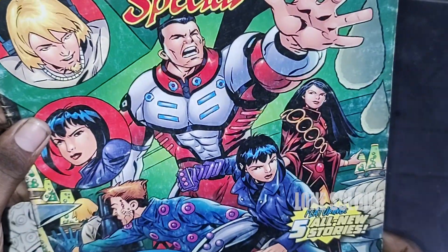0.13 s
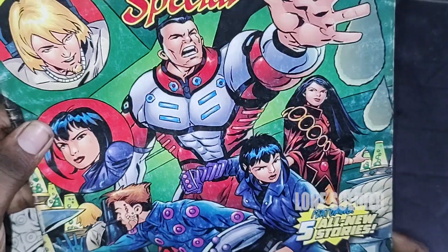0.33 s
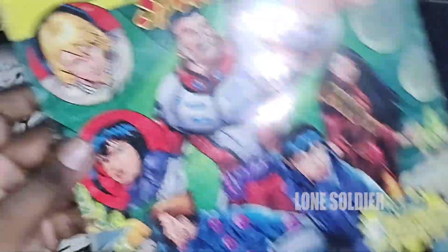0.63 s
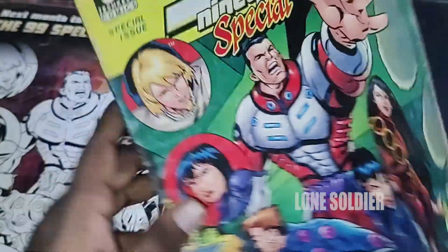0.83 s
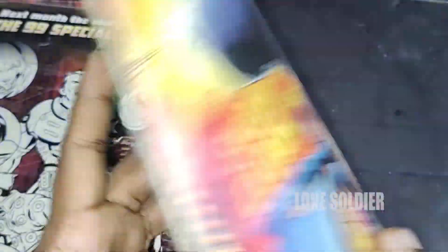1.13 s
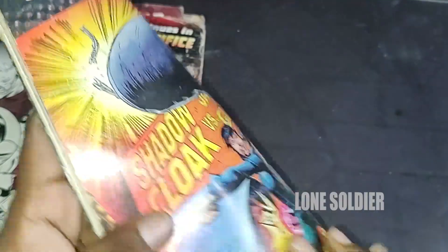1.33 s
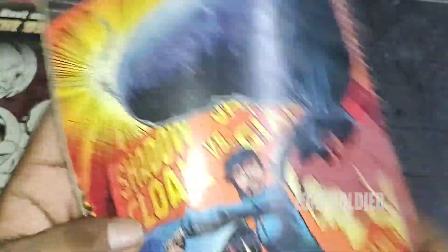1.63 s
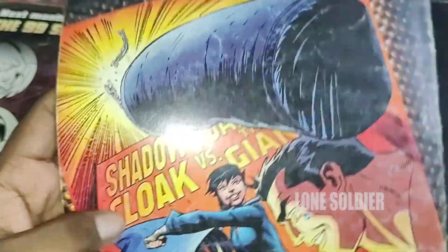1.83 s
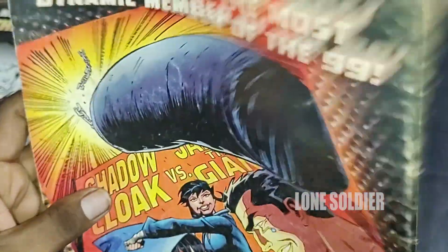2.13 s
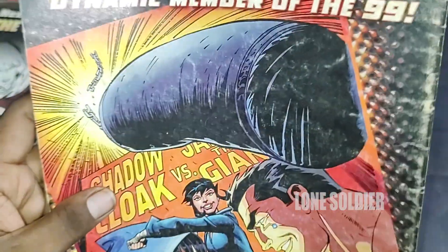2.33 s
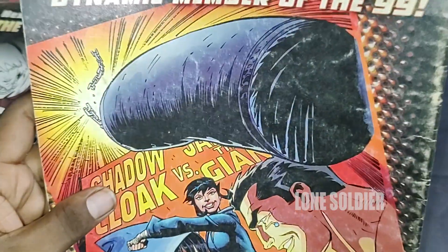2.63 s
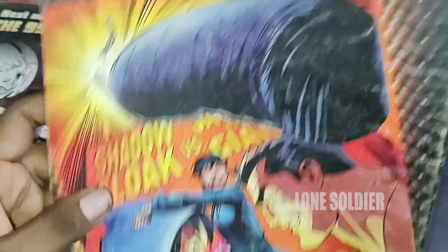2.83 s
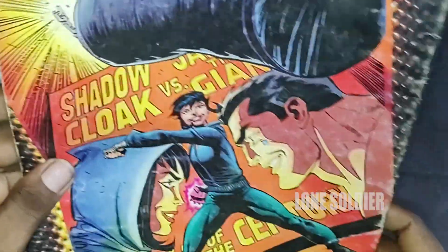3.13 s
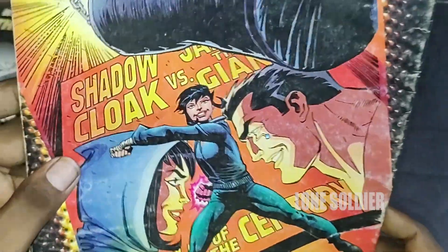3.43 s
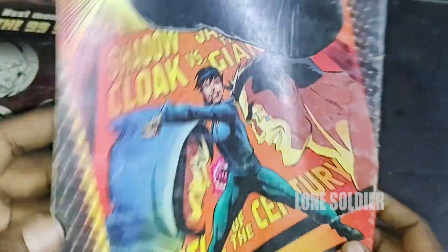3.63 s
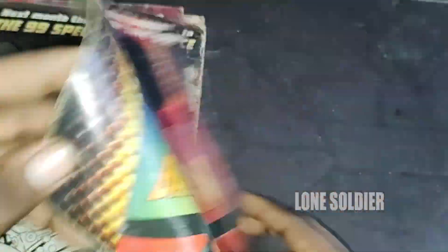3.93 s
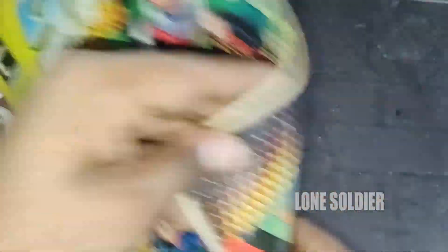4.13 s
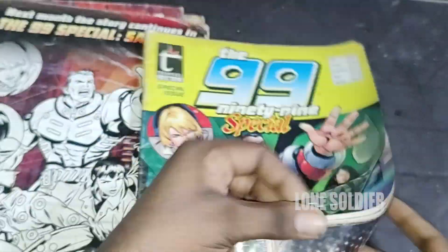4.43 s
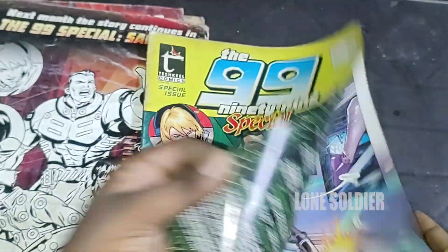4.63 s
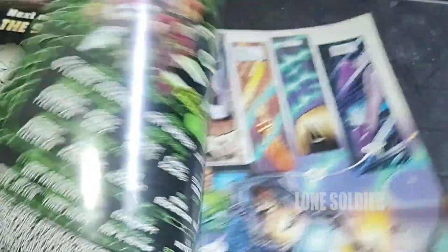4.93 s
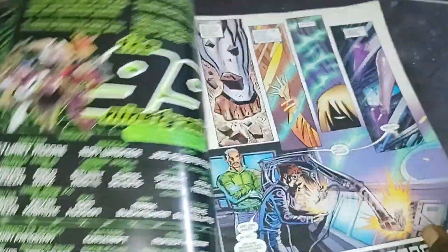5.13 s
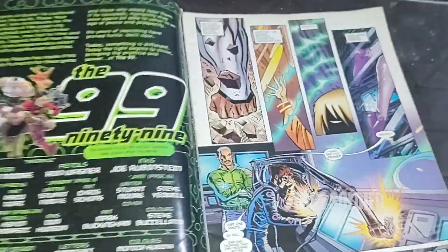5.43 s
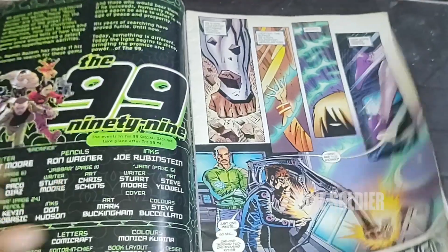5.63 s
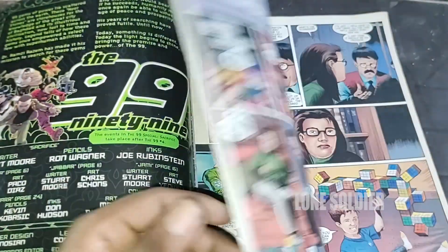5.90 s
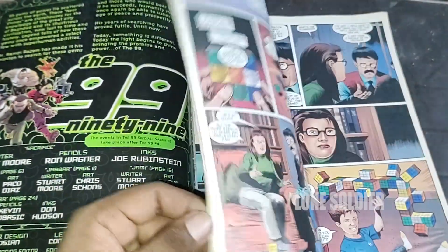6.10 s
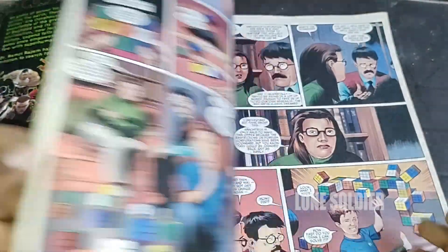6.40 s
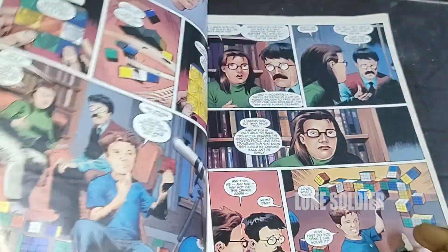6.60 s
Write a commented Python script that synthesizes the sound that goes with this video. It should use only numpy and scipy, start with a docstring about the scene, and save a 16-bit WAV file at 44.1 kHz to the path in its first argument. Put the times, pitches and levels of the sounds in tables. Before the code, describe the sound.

Hands handle a glossy comic book close to the microphone in a small room, over a faint low rumble, hum and hiss. From about 0.5 seconds fingers slide softly on the coated paper, with a short crack near 0.8 seconds. Light swishes and small clicks continue as the book is turned over, with a few duller snaps around 2 seconds. It stays quiet until about 3.5 seconds, with only soft sliding and slight ticks. From about 4.2 seconds the rustling grows clearly louder as the book flexes and opens. The sharpest crack comes at 4.6 seconds, followed by flapping sheets and crisp snaps near 5 and 5.4 seconds. A softer page turn crackles from about 5.7 to 6.3 seconds, then the rustling fades away.

```python
"""A small room: close to a phone, hands turn a glossy comic over, open it and turn a page.
Fingers slide on the coated paper, the sheets rustle as they bend and the whole book flexes. Buckles snap
through with a short crack, a duller shudder and a thud. A low rumble stands in the room's lowest modes,
with faint far tones and hiss behind it."""
import sys
import numpy as np
from scipy import signal
from scipy.fft import rfft, irfft
from scipy.io import wavfile

SR = 44100
rng = np.random.default_rng(int(sys.argv[2]) if len(sys.argv) > 2 else 0)


def int16_out(signal):
    """Quantize to a 16-bit WAV file."""
    q = np.round(np.clip(np.atleast_2d(signal).T, -1, 1) * 32767)
    wavfile.write(sys.argv[1], SR, q.astype(np.int16))


N = 298116

# Buckles: (time [s], crack peak [dB], crack pitch [Hz], half-width [1.3 oct],
#  shudder [dB re peak], thud [dB re peak + 6 dB])
BUCKLES = [(0.484, -50, 2380, 0.62, -12, -25), (0.639, -57, 660, 0.44, -29, -33),
           (0.783, -47, 2610, 1.5, -20, -19), (0.827, -27, 2350, 0.49, -16.5, -25.5),
           (1.311, -43.5, 1740, 2, -33, -17), (1.434, -46.5, 2280, 1.1, -15, -17.5),
           (1.942, -38.5, 700, 0.71, -16, -9.5), (2.079, -30.5, 970, 0.82, -13, -19.5),
           (2.184, -42, 685, .3, 1.5, -16.5), (2.217, -49, 1210, 0.36, -12, -10.5),
           (2.456, -61.5, 2220, 0.71, -3, -29), (3.025, -49, 685, 0.39, -19, -27),
           (3.12, -44, 805, 0.57, -14, -23.5), (3.156, -49.5, 566, 0.43, -34, -42),
           (3.606, -46.5, 1900, 0.64, -8.5, -19), (3.871, -56, 2060, 2, -12, -31),
           (3.998, -48, 6740, 0.27, -18.5, -31), (4.017, -42, 4640, 1.3, -8.5, -21.5),
           (4.173, -46, 6900, .4, -28, -43), (4.288, -48, 3510, 1.3, -4, -29),
           (4.324, -41.5, 900, 0.86, -16, -17), (4.568, -35, 1750, 0.48, -11, -37),
           (4.613, -9.5, 3340, 0.49, -12, -40), (4.755, -28.5, 3220, 1.2, -1, -30),
           (4.783, -38.5, 1500, 0.67, -6, -14), (4.909, -37.5, 2890, 0.42, -20, -29),
           (4.926, -39, 2980, 0.45, -22, -25), (4.896, -35.5, 2430, 0.68, -6, -18),
           (4.982, -35, 2880, .77, -14, -38), (5.009, -19.5, 2290, 0.27, -12.5, -39),
           (5.166, -35.5, 1590, 0.97, -2.5, -15), (5.392, -18.5, 2220, 0.68, -9, -33),
           (5.747, -35, 1850, 0.5, -10, -21), (5.761, -30, 1510, 0.69, -10, -35),
           (5.81, -37.5, 1010, 0.53, -20, -28), (5.976, -48, 1900, 0.68, -4.5, -41),
           (6.07, -48.5, 2300, 0.75, -21, -24), (6.209, -35.5, 1660, 0.99, -2, -19),
           (6.23, -33, 1290, 0.7, -7, -18.5), (6.263, -29, 1480, 0.65, -13, -21.5),
           (6.522, -49, 1390, 1.3, -22, -14), (6.551, -51, 850, 0.19, -7, -29)]
# Book body: (frequency [Hz], width [Hz], level [dB])
BOOK_MODES = [(214, 20, -5.5), (315, 38, -4), (377, 160, -8), (580, 82, 0.5), (764, 120, -10.5),
              (894, 17, -2.5)]


def snaps():
    """A buckle flips in a few milliseconds; the sheet shudders on, and the jolt thuds in the book."""
    out, t = np.zeros(N + SR), np.arange(SR // 3) / SR

    def burst(rise_s, t60_s):
        return (1 - np.exp(-t / rise_s)) * from_db(-60 * t / t60_s)

    for start_s, peak_db, crack_hz, spread, shudder_db, thud_db in BUCKLES:
        crack_noise, sheet_noise, body_noise = rng.standard_normal((3, len(t)))
        crack = band(crack_noise * burst(rise_s=0.00069, t60_s=0.012), crack_hz, 1.3 * spread)
        crack /= np.abs(crack).max()
        sheet = rms_one(band(sheet_noise, 0.7 * crack_hz, half_width_oct=0.85))
        shudder = from_db(shudder_db) * sheet * burst(rise_s=0.014, t60_s=0.12)
        body = sum(from_db(db) * rms_one(resonance(body_noise, hz, width_hz))
                   for hz, width_hz, db in BOOK_MODES)
        thud = from_db(thud_db + 6) * rms_one(body) * burst(rise_s=0.0029, t60_s=0.14)
        at = round(start_s * SR)
        out[at:at + len(t)] += from_db(peak_db) * (crack + shudder + thud)
    return out[:N]


# Hand strokes: (start [s], rise [s], hold [s], fall [s], slide [dB], rustle [dB], rustle centre [Hz],
#  flap [dB], slide tilt [dB/oct])
STROKES = [(0.461, 0.037, 0.072, 0.071, -65.5, -77, 2900, -89, 2),
           (0.706, 0.029, 0.067, 0.046, -64.5, -73, 3000, -78, -6),
           (0.795, 0.029, 0.057, 0.054, -59, -66, 2200, -61, -8),
           (0.838, 0.033, .1, 0.45, -63.5, -72.5, 2600, -76, -2),
           (0.998, 0.026, 0.034, 0.035, -57, -61, 3000, -72, -9),
           (1.275, 0.034, 0.036, 0.15, -60.5, -68.5, 3000, -66, -6),
           (1.369, 0.048, 0.035, 0.095, -59, -65.5, 2800, -66, -2),
           (1.458, 0.038, 0.019, 0.054, -55.5, -60, 3300, -65.5, -11),
           (1.48, 0.044, 0.065, 0.25, -68, -77, 2600, -82, -4),
           (1.765, .03, 0.11, 0.087, -66.5, -85, 3000, -81, -3),
           (1.926, 0.02, 0.1, 0.62, -66, -80, 1700, -71.5, -7),
           (2.755, .25, .12, .4, -63.5, -75.5, 2000, -72, 1.5),
           (3.2, .04, 0.18, 0.037, -74.5, -92, 1930, -91, -1),
           (3.528, 0.15, 0.044, 0.15, -62, -83, 2500, -84, 4.5),
           (3.703, 0.12, 0.057, 0.29, -57, -73.5, 3000, -75.5, 1.5),
           (4.001, 0.018, 0.079, 0.23, -57, -75.5, 2300, -76, 7),
           (4.233, 0.094, 0.011, 0.033, -49.5, -73, 2700, -59.5, 8),
           (4.259, 0.13, 0.045, 0.21, -42.5, -49, 2650, -67, 3),
           (4.332, 0.13, .11, 0.088, -43.5, -47, 1560, -63, 1),
           (4.589, 0.016, 0.072, 0.084, -46.5, -43.5, 2700, -51.5, 2),
           (4.758, 0.035, 0.011, 0.14, -45, -45.5, 1650, -47.5, -5.5),
           (4.862, .15, 0.12, 0.17, -41.5, -47, 2330, -53.5, -1.7),
           (5.002, 0.014, 0.012, 0.02, -55, -40.5, 1000, -45.5, .7),
           (5.158, 0.018, 0.02, 0.049, -62, -56, 960, -48, .7),
           (5.121, 0.05, 0.017, 0.6, -51, -49, 2300, -54.5, -4),
           (5.378, 0.018, 0.038, 0.065, -50, -47.5, 2100, -48.5, -8),
           (5.406, 0.064, 0.18, 0.081, -53.5, -59.5, 2400, -65.5, -0.5),
           (5.718, .03, 0.029, 0.21, -59.5, -54.5, 1600, -55.5, -12.5),
           (5.923, 0.049, 0.029, 0.13, -63, -67.5, 2500, -67.5, .7),
           (6.03, .04, 0.13, 0.14, -63.5, -70.5, 2300, -70, -1.5),
           (6.159, 0.042, 0.022, 0.18, -54, -60.5, 1900, -64.5, -3),
           (6.28, 0.033, 0.14, 0.23, -74, -75.5, 2000, -88, 0),
           (6.459, 0.034, 0.075, 0.24, -70.5, -74, 1700, -74, -0.5)]


def handling():
    """Each stroke rises, holds and falls, driving slide, rustle and flap; the loudest sets the colour."""
    t = np.arange(0, N + 64, 64) / SR
    rest_db, rest_centre_hz = [[-88], [-83.5], [-79.5]], 1595   # held still: slide, rustle, flap
    ramp_db = 23.5   # per rise or fall time
    powers = from_db(rest_db) ** 2 * np.ones_like(t)
    pitch_sum, tilt_sum = powers[1] * np.log(rest_centre_hz), 0
    for start, rise, hold, fall, slide_db, rustle_db, centre_hz, flap_db, tilt_db_oct in STROKES:
        outside_hold = np.maximum((start + rise - t) / rise, (t - start - rise - hold) / fall)
        drop_db = ramp_db * np.maximum(outside_hold, 0)
        stroke = from_db([[slide_db], [rustle_db], [flap_db]] - drop_db) ** 2
        powers += stroke
        pitch_sum += stroke[1] * np.log(centre_hz)
        tilt_sum += stroke[0] * tilt_db_oct
    curves = [t, *10 * np.log10(powers), np.exp(pitch_sum / powers[1]), tilt_sum / powers[0]]
    slide_db, rustle_db, flap_db, centre_hz, tilt_db_oct = per_sample(np.transpose(curves))
    return slide(slide_db, tilt_db_oct) + rustle(rustle_db, centre_hz) + flap(flap_db)


# Finger friction: (frequency [Hz], relative density [dB])
SLIDE_SPECTRUM = [(1200, -48), (2000, -26), (3000, -7), (4000, 4), (5400, -1), (6200, -3), (7500, -5),
                  (9000, -4)]


def slide(level_db, tilt_db_oct):
    """Skin on coated paper: dense slips merge into a bright hiss whose bands waver."""
    slips = rfft(coloured(grains(per_s=13000, spread_db=-1.5), SLIDE_SPECTRUM))
    bins_oct = np.log2(np.fft.rfftfreq(N, 1 / SR) / 4800 + 1e-9)
    centres_oct = np.arange(-3, 3) / 3
    out = 0
    for centre_oct, selector in zip(centres_oct, np.eye(len(centres_oct))):
        part = irfft(slips * np.interp(bins_oct, centres_oct, selector), N)
        out += from_db(tilt_db_oct * centre_oct + 1.5 * drift(5.4)) * part
    return from_db(level_db + 1.08 * drift(19)) * out


def rustle(level_db, centre_hz, spread_oct=0.55):
    """Creases ring patches of the sheet; those near the moving centre pitch are loudest."""
    out, power = 0, 0
    for hz in np.geomspace(900, 5000, num=16):
        weight = np.exp(-0.5 * (np.log2(hz / centre_hz) / spread_oct) ** 2)
        patch = rms_one(resonance(grains(per_s=1500, spread_db=2.5), hz, 0.09 * hz))
        out += weight * from_db(2.2 * drift(8)) * patch
        power += weight ** 2
    return from_db(level_db) * out / np.sqrt(power)


def flap(level_db):
    """The whole book flexes: low, lumpy bending waves."""
    out = 0
    for hz in np.geomspace(380, 1150, num=7):
        lumps = from_db(4 * drift(30))
        out += lumps * rms_one(resonance(grains(per_s=900, spread_db=2), hz, 0.17 * hz))
    return from_db(level_db) * rms_one(out)


# Rumble envelope: (time [s], level [dB])
RUMBLE_LEVEL = [(0, -67), (2.05, -63), (2.9, -65), (3.09, -61.5), (3.4, -66), (4.25, -67), (4.55, -59.5),
                (5.57, -62), (5.85, -68), (6.76, -69)]
# Broad room modes: (frequency [Hz], width [Hz], relative level [dB])
ROOM_MODES = [(61, 28, -1), (112, 40, -0.5), (176, 26, 2.5), (207.2, 21, -2.5), (229, 7.5, -3),
              (273.7, 26, -15)]


def rumble():
    """Distant low noise heard through the room's broad modes."""
    level_db, = per_sample(RUMBLE_LEVEL)
    modes = sum(from_db(db + 2.6 * drift(2.3)) * narrow_noise(hz, width_hz)
                for hz, width_hz, db in ROOM_MODES)
    return from_db(level_db) * rms_one(modes)


# Narrow room modes: (frequency [Hz], rms wander [Hz])
HUM_MODES = [(92, 1.8), (134, 2.2), (167, 2.2)]
# Swells, one list per narrow mode: (start [s], end [s], level [dB])
HUM_SWELLS = [
    [(1.75, 2.25, -76), (2.92, 3.66, -66.5), (3.7, 4.15, -75), (4.35, 4.55, -69), (4.62, 5.4, -69.5)],
    [(-.5, 1.36, -72), (1.6, 3.1, -67.5), (2.28, 2.86, -67), (2.85, 3.22, -63), (4.28, 4.58, -67),
     (6.2, 7.2, -75.5)],
    [(-0.5, 2.7, -66), (2, 2.78, -75.5), (2.5, 3.47, -71), (4.5, 4.95, -62), (5.5, 5.47, -69), (8, 12, -71)],
]


def room_hum(rest_db=-79):
    """Three narrow room modes hum almost like tones, wandering in pitch and level."""
    out = 0
    for (hz, wander_hz), swells in zip(HUM_MODES, HUM_SWELLS):
        gain = from_db(rest_db) + sum(from_db(db) * swell(start, end) for start, end, db in swells)
        phase = 2 * np.pi * np.cumsum(hz + wander_hz * drift(2.5)) / SR
        out += gain * from_db(2.1 * drift(8.5)) * np.sqrt(2) * np.sin(phase)
    return out


# Far tones: (start [s], end [s], frequency [Hz], level [dB])
FAR_TONES = [(0.24, 0.73, 1003, -80.5), (1.3, 1.59, 580, -69.5), (2.752, 3.302, 890, -77.5),
             (2.54, 3.1, 630, -88), (3.546, 4.094, 240, -72.5)]


def far_tones():
    """Thin, unsteady tones from far off fade in and out."""
    return sum(from_db(db) * narrow_noise(hz, width_hz=5.1) * swell(start, end)
               for start, end, hz, db in FAR_TONES)


# Noise floor: (frequency [Hz], relative density [dB])
HISS_SPECTRUM = [(150, -36.5), (260, 6.5), (380, -3), (940, -6.5), (1300, -24.5), (2100, -18),
                 (4500, -16.5), (9000, -32)]


def hiss(level_db=-72.5):
    """Faint, steady background noise."""
    return from_db(level_db) * coloured(rng.standard_normal(N), HISS_SPECTRUM)


def from_db(db):
    """Decibels to gain."""
    return 10 ** (np.asarray(db) / 20)


def rms_one(x):
    """Scale to rms 1."""
    return x / np.sqrt(np.mean(x ** 2) + 1e-20)


def per_sample(rows):
    """Interpolate (time [s], values...) rows to one curve per value."""
    times_s, *columns = np.transpose(rows)
    return [np.interp(np.arange(N) / SR, times_s, column) for column in columns]


def swell(start_s, end_s):
    """Arch from 0 to 1 and back."""
    progress = np.clip((np.arange(N) / SR - start_s) / (end_s - start_s), 0, 1)
    return np.abs(np.sin(np.pi * progress)) ** 0.5


def drift(rate_hz):
    """Slow random wander, rms 1."""
    hop, run_in = 40, 2000
    r = np.exp(-2 * np.pi * rate_hz * hop / SR)
    noise = rng.standard_normal(N // hop + run_in + 2)
    slow = signal.lfilter([1], [1, -2 * r, r * r], noise)[run_in:]
    return np.interp(np.arange(N) / hop, np.arange(len(slow)), rms_one(slow))


def grains(per_s, spread_db):
    """Tiny slips of uneven size at random times."""
    sizes = from_db(spread_db * np.minimum(rng.exponential(1, N), 4)) * rng.standard_normal(N)
    return sizes * (rng.random(N) < per_s / SR) + 1e-18


def resonance(x, hz, width_hz):
    """Two-pole resonance, peak gain 1."""
    r = np.exp(-np.pi * width_hz / SR)
    gain = (1 - r * r) / 2
    return signal.lfilter([gain, 0, -gain], [1, -2 * r * np.cos(2 * np.pi * hz / SR), r * r], x)


def narrow_noise(hz, width_hz):
    """Noise through two resonances, settled; rms 1."""
    ringing = resonance(rng.standard_normal(N + SR), hz, width_hz)
    return rms_one(resonance(ringing, hz, 3 * width_hz)[SR:])


def band(x, hz, half_width_oct):
    """Band-pass around hz."""
    edges_hz = np.clip(hz * 2 ** (half_width_oct * np.array([-1, 1])), 20, 0.45 * SR)
    return signal.sosfilt(signal.butter(2, edges_hz, "band", fs=SR, output="sos"), x)


def coloured(x, spectrum):
    """Impose a (frequency [Hz], level [dB]) spectrum; rms 1."""
    hz, db = np.transpose(spectrum)
    bins_hz = np.maximum(np.fft.rfftfreq(N, 1 / SR), 1)
    gain = from_db(np.interp(np.log(bins_hz), np.log(hz), db))
    return rms_one(irfft(rfft(x) * gain, N))


def scene():
    """Paper over the room's background, mono."""
    paper = handling() + snaps()
    background = hiss() + rumble() + room_hum() + far_tones()
    return (paper + background)[None]


def record(dry):
    """Phone microphone: bass cut, dip near 4 kHz, treble roll-off, steep band limit."""
    x = signal.sosfilt(signal.butter(2, 48, "high", fs=SR, output="sos"), dry)
    x = x - 0.5 * resonance(x, hz=4250, width_hz=1100)
    x = signal.sosfilt(signal.butter(16, 7500, fs=SR, output="sos"), x)
    return signal.sosfilt(signal.cheby2(20, 60, 8560, fs=SR, output="sos"), x)


dry = scene()
out = record(dry)
int16_out(out)
```